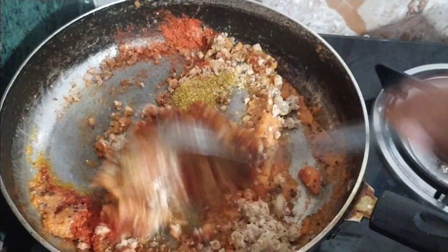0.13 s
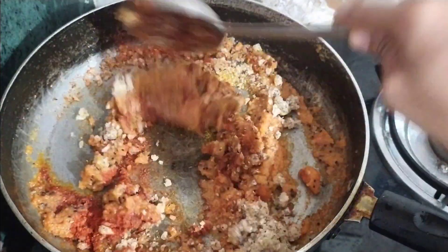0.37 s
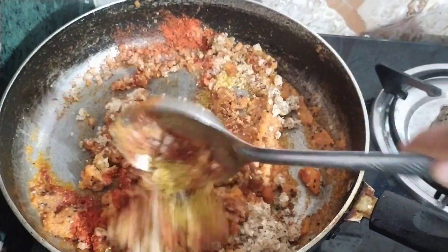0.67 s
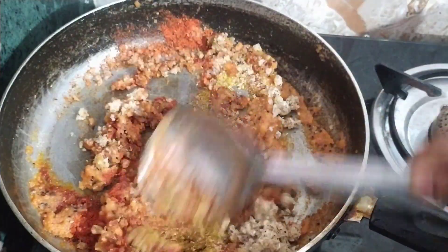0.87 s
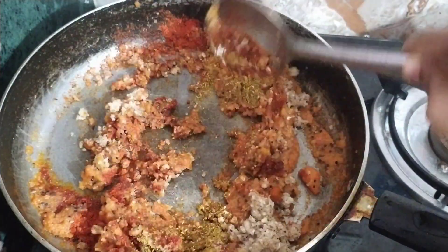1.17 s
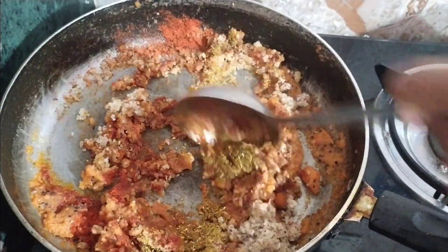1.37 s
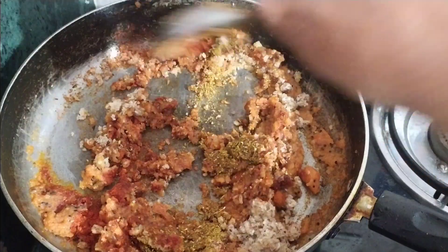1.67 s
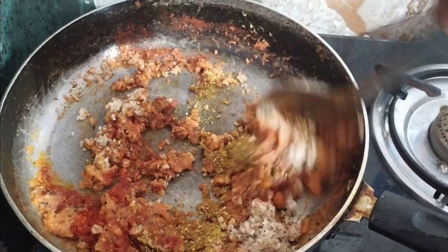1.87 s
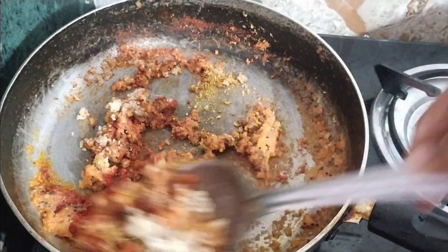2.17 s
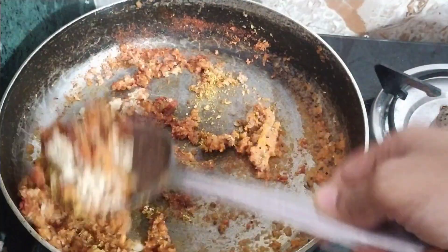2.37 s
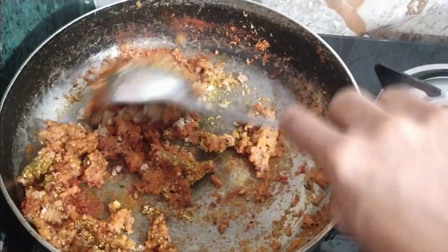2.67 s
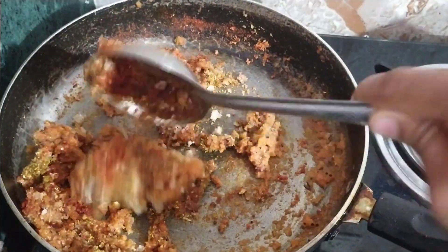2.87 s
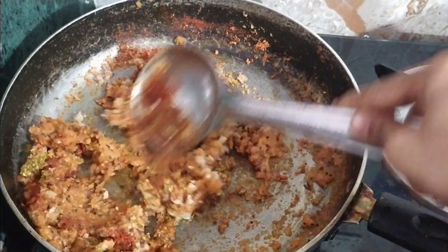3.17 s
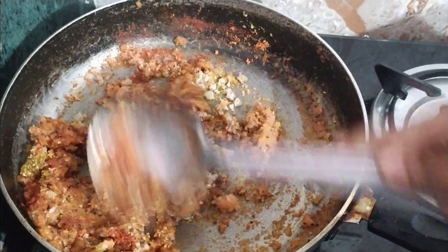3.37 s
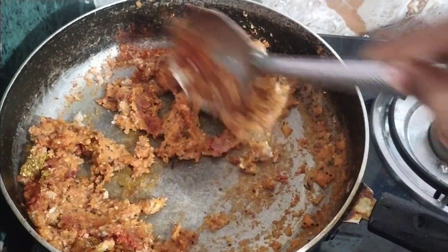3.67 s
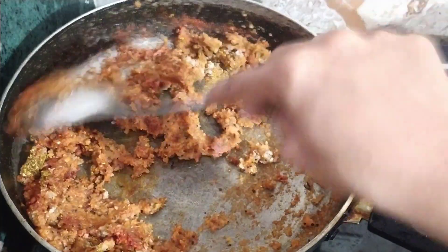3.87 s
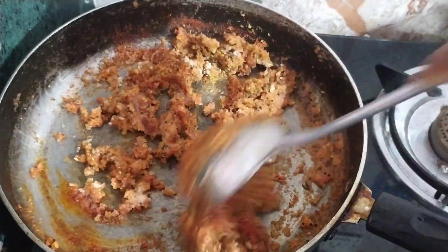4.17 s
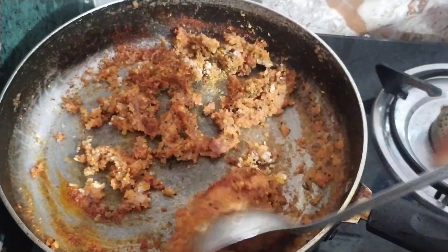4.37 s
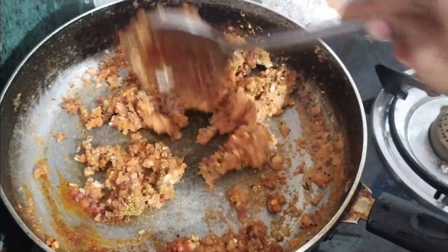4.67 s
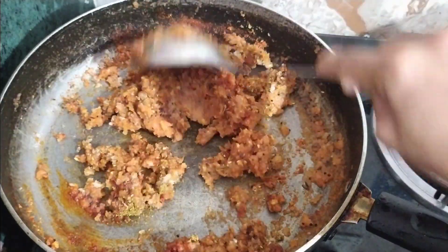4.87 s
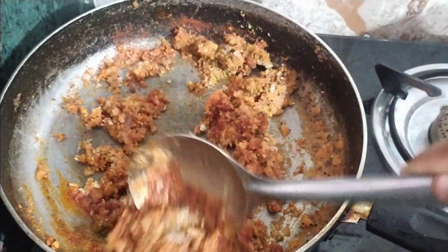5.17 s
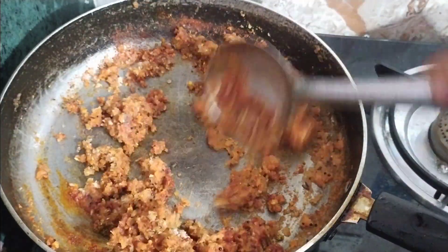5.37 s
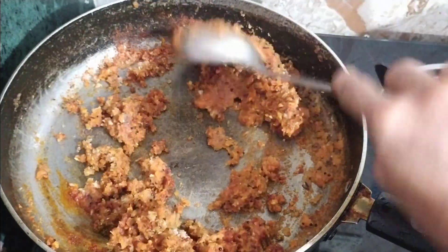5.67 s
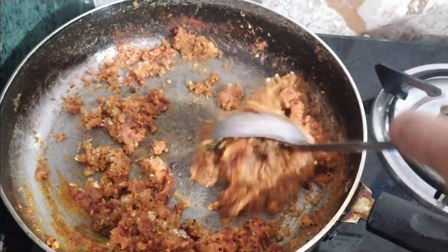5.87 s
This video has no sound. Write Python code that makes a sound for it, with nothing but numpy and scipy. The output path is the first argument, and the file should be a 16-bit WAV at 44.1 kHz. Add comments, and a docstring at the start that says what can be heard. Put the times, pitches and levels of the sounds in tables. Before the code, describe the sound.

A steel spoon stirs thick paste in a shallow metal pan. Bright oil sizzle runs throughout, crackling with tiny pops. Hard knocks come early, followed by uneven, short scrapes, soft paste thuds and wet hisses. Stirring continues in bursts until a rough squeak near the end. The microphone is close in a small echoing kitchen, with nearly all the sound on the left.

```python
"""Stirring spice paste in a frying pan

A steel spoon stirs thick paste: it knocks on the pan (impact, bending waves, modes of the metal), then drags
and chatters over it (friction, stick and slip), while lumps of paste thud. The paste sizzles in oil
throughout as steam bubbles burst, and it flares where it is turned; a gas flame rushes softly.
A small hard-walled kitchen adds diffuse echoes; the left microphone takes nearly all of the sound,
and a limiter catches the hardest knocks."""
import sys
import numpy as np
from scipy import signal
from scipy.fft import rfft, irfft, next_fast_len
from scipy.io import wavfile
from scipy.ndimage import uniform_filter1d, minimum_filter1d, map_coordinates

SR = 44100
rng = np.random.default_rng(int(sys.argv[2]) if len(sys.argv) > 2 else 0)


def wav_record(signal):
    """Record a signal, one row per channel, as 16-bit PCM in the file named by sys.argv[1]."""
    frames = np.transpose(np.atleast_2d(signal))
    bounded = np.clip(frames, -1, 1)
    # unit amplitude maps onto the largest positive 16-bit level
    quanta = np.round(bounded * 32767).astype(np.int16)
    wavfile.write(sys.argv[1], SR, quanta)


N = 265923  # samples in the scene

# Event levels are relative: the functions add an offset for each layer.
# Oil frying. Each row: time in seconds, level in dB.
FRYING = [(0.0, -30.5), (0.16, -33), (0.37, -30.5), (0.86, -31.5), (1.24, -30.5), (1.53, -32), (1.93, -33),
          (2.85, -31.5), (3.12, -31.5), (3.32, -33), (3.79, -33.5), (4.05, -32), (4.3, -33), (4.45, -30),
          (4.75, -32.5), (5.0, -30), (5.62, -33.5), (5.81, -31.5), (6.03, -31.5)]
# Turned paste settles on hot metal and the frying flares up. Each row: start in seconds, rise in dB.
FLARES = [(0.24, 2), (4.225, 3.5), (5.13, 4)]
# The spoon is pushed through the paste. Each row: start in seconds, length in seconds, metal scrape in dB,
# ring in dB, ring pitch in Hz, paste drag in dB, wet hiss in dB.
PUSHES = [(0.0, 0.046, -31, -60, 890, -50, -53), (0.178, 0.19, -31.5, -33, 987, -41, -53),
          (0.58, 0.06, -37, -47, 880, -54, -46), (0.625, 0.13, -22.5, -26, 884, -35.5, -33.5),
          (0.913, 0.14, -39.5, -49, 870, -48, -41), (0.993, 0.061, -29, -25.5, 1018, -46, -31.5),
          (1.063, 0.054, -29.5, -29, 890, -45, -35), (1.317, 0.1, -32.5, -47, 784, -47, -40),
          (1.37, 0.1, -30.5, -31.5, 832, -53, -30.5), (1.708, 0.14, -31, -34, 760, -35, -39),
          (1.81, 0.37, -31.5, -33, 751, -42.5, -33.5), (2.058, 0.081, -36.5, -30.5, 776, -57, -46),
          (2.137, 0.19, -38, -46, 774, -42.5, -38.5), (2.235, 0.32, -37, -43, 815, -52, -40),
          (2.74, 0.037, -32.5, -53, 880, -42, -38), (2.768, 0.11, -24, -31, 920, -34, -46),
          (3.223, 0.11, -27, -26, 1000, -44, -41), (3.252, 0.091, -31.5, -30, 930, -41, -51),
          (3.548, 0.08, -39, -40, 950, -34, -44), (3.607, 0.089, -23, -24.5, 1030, -41, -32),
          (3.656, 0.097, -31, -29, 974, -41, -36.5), (3.992, 0.13, -27.5, -24.5, 938, -27, -47),
          (4.165, 0.072, -32.5, -35, 900, -36.5, -39), (4.486, 0.08, -33, -47, 820, -37, -43),
          (4.565, 0.17, -32.5, -52, 945, -64, -32), (4.623, 0.14, -44, -32, 970, -55, -35),
          (4.943, 0.18, -28.5, -34, 885, -38, -46), (5.335, 0.11, -34.5, -46, 796, -63, -36),
          (5.409, 0.14, -28, -26.5, 903, -38, -34), (5.811, 0.14, -25.5, -29, 954, -42, -37),
          (5.872, 0.089, -27, -30, 910, -50, -32)]
# The spoon meets the pan. Each row: start in seconds, clack in dB, broad clank in dB against the clack,
# tick in dB against the clack, clack pitch in Hz, clack's time to peak in seconds,
# direct sound on the right in dB.
KNOCKS = [(0.182, 3, -12, -9, 1150, .0018, 5.5), (0.188, -7.5, -2.5, -14, 1120, 0.0023, 0),
          (0.555, 0.5, -7.5, -10.5, 1393, 0.0023, 9.5), (0.559, -8, -8, -12, 780, .0025, 6),
          (1.001, -19, -6, -9, 1160, 0.002, -4), (1.010, -19, -4.5, -6, 1230, 0.0018, -5),
          (1.069, -18, -5.5, -12, 780, 0.0037, -5), (1.094, -18, -10, -10, 1350, 0.0026, -5),
          (1.34, -25, 2.5, -11, 1280, .003, -5), (1.693, -21.5, -9, -22, 770, 0.0042, -5),
          (1.729, -19, 4.5, -9, 1220, 0.0039, 5), (2.024, -6, -12, -24, 1540, 0.0016, 16),
          (2.031, -18.5, -18, -27, 760, 0.0048, 2), (2.054, -19, 0, -16, 750, 0.0051, -5),
          (2.219, -25.5, -15, -16, 1330, 0.0029, -5), (2.263, -29, -3, -19, 814, 0.0038, -5),
          (2.306, -23, -24, -24, 970, 0.0028, -5), (2.333, -22, -16, -9, 810, 0.0036, -5),
          (2.467, -22, -14, -27, 767, 0.0033, -5), (2.762, -9, -1, -11.5, 1410, 0.0024, 9),
          (2.765, -7.5, -16, -26, 844, 0.0039, 3), (2.771, -16, -8, -31, 820, 0.002, -3),
          (3.550, -31.5, 1.5, -10, 1450, .0022, -5), (3.639, -19, -8.5, -25, 1290, 0.0034, -5),
          (3.662, -19.5, -2, -22, 1250, 0.0019, -5), (3.714, -17, -18, -22, 1380, 0.0024, -5),
          (3.957, -10.5, 1, -20, 936, 0.0022, 8), (4.004, -18.5, 2.5, 1, 845, 0.0027, 5),
          (4.014, -12.5, -11, -27, 764, 0.0044, -3), (4.495, -16.5, -4, -7, 2115, 0.003, 3),
          (4.499, -15.5, -9.5, -26, 838, 0.0042, -5), (4.92, -10.5, -1, -12, 1350, 0.0025, 12),
          (4.957, -13, 2, -6.5, 1840, 0.0027, 8), (4.989, -17, -5, -22, 1870, 0.002, -5),
          (5.087, -16, -4, -29, 1315, 0.0028, 5), (5.366, -27, -2, -14, 1220, .0022, -3),
          (5.841, -19, -14, -16, 1390, 0.00094, -3), (5.897, -13, -14, -22, 1870, 0.0022, -5),
          (5.899, -15, -8, -24, 837, 0.0032, -5)]
# Lumps of paste land and the pan rocks on the burner. Each row: start in seconds, thump in dB,
# thump pitch in Hz, splat in dB.
PLOPS = [(0.201, -28, 248, -26), (0.211, -21, 400, -26), (0.22, -23.5, 190, -19), (0.557, -22, 400, -22),
         (0.932, -34, 402, -28), (1.338, -23, 229, -27), (1.354, -37, 217, -24.5), (1.703, -29, 243, -27),
         (1.918, -25, 470, -29), (2.048, -30.5, 240, -30), (3.554, -32, 360, -24.5),
         (3.957, -30, 293, -22.5), (4.015, -19, 426, -19.5), (4.022, -37, 167, -31), (4.502, -26, 259, -27),
         (4.513, -24, 394, -31), (4.519, -27.5, 236, -41), (4.92, -23.5, 232, -19), (4.965, -30, 240, -37),
         (4.957, -22, 505, -19.5)]
# The bowl catches on the metal and sings above the scrape. Each row: start in seconds, length in seconds,
# level in dB, pitch in Hz.
SINGS = [(0.563, 0.1, -31, 2100), (0.63, 0.16, -27.5, 1820), (1.074, 0.051, -27, 1360),
         (1.334, 0.035, -28.5, 1304), (1.363, 0.07, -27, 1940), (1.724, 0.034, -28, 2530),
         (2.756, 0.097, -24, 2490), (2.77, 0.058, -26, 1290), (3.257, 0.07, -28.5, 1286),
         (3.627, 0.049, -22.5, 1400), (3.964, 0.034, -22, 1420), (4.957, 0.052, -25, 1910),
         (4.627, 0.069, -31, 2880), (4.614, 0.098, -33, 3640), (5.413, 0.067, -31, 2120),
         (5.885, 0.076, -27, 1320)]
# The spoon's edge sticks and slips. Each row: time in seconds, level in dB, mean slips per second.
CHATTER = [(5.804, -24, 1220), (5.811, -24.5, 1370), (5.832, -16, 1330), (5.865, -22.5, 1410),
           (5.899, -18.5, 1380), (5.931, -26, 1300), (5.945, -60, 2200)]
# Modes of the pan, damped by the paste. Each row: frequency in Hz, level in dB, 60 dB decay time in seconds.
PAN_MODES = [(748, -4.5, 0.018), (1016, -1.5, 0.038), (1319, -2, 0.043), (1525, 3.5, 0.0084),
             (1870, 3, 0.012), (2160, -1.5, 0.015), (2640, 5, 0.005), (3710, -5.5, 0.1), (749, -26.5, 0.16),
             (783, -22, 0.25), (1402, -7, 0.16), (1920, -24, 0.13)]
# Reverberation of the kitchen. Each row: frequency in Hz, 60 dB decay time in seconds.
KITCHEN_DECAY = [(150, 0.46), (400, 0.6), (1000, 0.4), (2800, 0.53), (7000, 0.37), (14000, 0.28)]

# Spectra. Each row: frequency in Hz, relative level in dB per Hz.
ROOM_TONE_SPECTRUM = [(20, 9.5), (45, -5), (100, -7.5), (200, -5), (500, -10.5), (1000, -15.5), (3000, -62),
                      (10000, -45)]  # rumble of the kitchen
FLAME_SPECTRUM = [(60, -38), (170, 13.5), (270, 1), (360, 11.5), (560, -23), (1000, -5), (3000, -6)]  # rush of the gas flame
SIZZLE_SPECTRUM = [(100, -17), (300, -11), (600, -15), (800, -10), (1300, -9.5), (3300, -11), (5200, -9),
                   (6500, -5), (8000, -1.5), (10500, 1), (11300, 7), (12600, -2.5), (14500, -10),
                   (15700, -14.5)]  # merged steam bubbles
POP_SPECTRUM = [(500, -3), (1500, -8), (3500, 2), (7000, -6), (11300, -25), (15000, -14)]  # single bubbles popping
GRIT_SPECTRUM = [(300, -29.5), (600, -10.5), (800, 8), (1100, -4), (2000, 0.5), (3000, -1), (6000, -27),
                 (12000, -2)]  # slips of the edge on the metal
CRUNCH_SPECTRUM = [(300, -26), (800, 0), (1500, -2.5), (2600, -6.5), (5000, -8), (12000, -21)]  # bits of spice cracking under the edge
PASTE_SPECTRUM = [(40, -32), (110, -13.5), (175, -12), (230, 5), (295, -3), (400, 5.5), (500, -2.5),
                  (650, 1), (1100, -59), (3000, -74)]  # soft paste, dragged or landing
STEAM_SPECTRUM = [(300, -22), (900, -6.5), (2500, 4.5), (3700, 1.5), (5500, 6), (8500, 6), (10400, 5),
                  (11300, 14.5), (12800, 1), (15500, -21)]  # steam from smeared paste
TICK_SPECTRUM = [(60, -83), (300, -53), (900, -14), (2500, 3), (3700, 7), (4700, 7), (5500, 8.5), (8500, 8),
                 (10400, 7.5), (11300, 13.5), (12800, 2), (15500, -23)]  # the tick of steel
CLANK_SPECTRUM = [(40, -42), (120, -13.5), (400, -8.5), (650, -0.5), (850, 3.5), (1400, 1.5), (2000, 0),
                  (2600, -3.5), (3100, -9), (6000, -13.5), (12000, -23)]  # the pan's broad answer to a blow
# Filter shapes. Each row: frequency in Hz, gain in dB.
SQUAWK_SHAPE = [(400, -30), (900, -1), (1400, 2), (1850, 21), (2300, -5), (3500, -13), (8000, -9)]  # colour of the slipping force
RIGHT_MICROPHONE = [(60, 1.5), (200, -30), (500, -44), (1200, -34.5), (2400, -31), (4400, -23), (6500, -18),
                    (8300, -11.5), (9800, -20), (11200, -28), (13000, -23.5), (15500, -6)]  # the right microphone against the left

FRY_DB = 6.5  # the sizzle over its level curve
FLARE_RISE_S = 0.028  # time to the top of a flare
PRESS_SHARE, HOLD_SHARE = 0.19, 0.067  # parts of a push in which the force builds and is held
RING_SPLIT, RING_T60_S = 0.011, 0.022  # close pair under the spoon: half spacing as a share, decay
SING_SPLIT, SING_T60_S = 0.025, 0.017  # the same for the bowl's singing mode
SAG_PER_S = 0.57  # exponential rate at which the rings sink as the spoon travels
CLACK_GLIDE, GLIDE_S = 1, 0.00075  # a clack starts this share above its pitch and sinks with this time constant
KNOCK_WET_DB, DRIER_PER_DB = -4, 0.2091  # echo gain of a 0 dB knock; dB more for each dB softer (paste muffles)
ROOM_DELAY_S, ROOM_BUILD_S = 0.004, 0.0024  # wait for the wall reflections, time they take to thicken
TOP_HZ = 15850  # upper band limit


def amp(db):
    """Level law: decibels to linear gain."""
    return 10 ** (np.asarray(db) / 20)


def unit(x):
    """Normalisation of power: x at rms 1."""
    return x / np.sqrt(np.mean(x ** 2) + 1e-20)


def peak(x):
    """Normalisation of amplitude: x at peak 1."""
    return x / np.abs(x).max()


def steadied(x, size):
    """Automatic gain: x held near rms 1 over stretches of size samples."""
    local_power = np.abs(uniform_filter1d(unit(x) ** 2, size=size))
    return x / np.sqrt(local_power + 1e-4) / np.std(x)


def along(points, hz):
    """Interpolation on a logarithmic frequency axis of (Hz, value) points."""
    f, v = np.transpose(points)
    return np.interp(np.log(hz + 1), np.log(f + 1), v)


def gains(rows):
    """Envelope: gain per sample for each column after the time, read as dB; silent outside the rows."""
    s, *columns = np.transpose(rows)
    now = np.arange(N) / SR
    inside = (now >= s[0]) & (now <= s[-1])
    gate = uniform_filter1d(1.0 * inside, size=400)
    return np.array([gate * amp(np.interp(now, s, column)) for column in columns])


def wobble(rate):
    """Slow random modulation: a smooth curve through rate random knots a second."""
    knots = rng.standard_normal(int(N * rate / SR) + 4)
    return map_coordinates(knots, [np.arange(N) * rate / SR])


def swell(t, rise):
    """Critically damped pulse: a smooth bump that peaks at 1 at time rise and then dies away."""
    return t / rise * np.exp(1 - t / rise)


def coloured(x, spectrum):
    """Minimum-phase filtering: the cepstrum is folded so that the given (Hz, dB) shape is causal."""
    m = 2 * next_fast_len(x.shape[-1] // 2 + 4096)
    cepstrum = irfft(np.log(amp(along(spectrum, np.fft.rfftfreq(m, 1 / SR)))))
    cepstrum[1:m // 2] *= 2
    cepstrum[m // 2 + 1:] = 0
    return irfft(rfft(x, m) * np.exp(rfft(cepstrum)), m)[..., :x.shape[-1]]


def grains(rate, spread_db):
    """Random arrivals: tiny clicks, rate a second on average, of random sign and uneven size; rms 1."""
    size = amp(spread_db * np.minimum(rng.exponential(size=N), 3.5))
    arrivals = rng.random(N) < rate / SR
    return unit(arrivals * size * rng.choice([-1, 1], N))


def add(track, s, sound):
    """Superposition: mix a sound into the track at time s."""
    part = track[..., round(s * SR):][..., :sound.shape[-1]]
    part += sound[..., :part.shape[-1]]


def in_kitchen(x, wet_db, right_db=2.5):
    """Diffuse reverberation: direct sound on two channels plus a decaying noise tail for each microphone."""
    hz, t, z = signal.stft(rng.standard_normal((2, SR * 2 // 3)), SR, nperseg=256)
    decay = amp(-60 * t / along(KITCHEN_DECAY, hz)[:, None])
    tail = signal.istft(z * decay, SR, nperseg=256)[1]
    tail = tail * (1 - np.exp(-np.arange(tail.shape[1]) / SR / ROOM_BUILD_S))
    tail = np.pad(tail / np.linalg.norm(tail[0]), ((0, 0), (round(ROOM_DELAY_S * SR), 0)))
    echo = signal.oaconvolve(x[None], tail, axes=1)[:, :len(x)]
    # the shielded right microphone hears more of the walls than of the pan
    return x * amp([[0], [right_db]]) + amp(wet_db) * echo * amp([[0], [5]])


def pan_ring(modes):
    """Modal superposition: the given pan modes, each decaying exponentially, answer one tap."""
    t = np.arange(SR // 3) / SR
    ring = np.zeros(len(t))
    for k, (hz, db, t60) in enumerate(modes):
        ring += (-1) ** k * amp(db - 60 * t / t60) * np.cos(2 * np.pi * hz * t)
    return ring


def bending_wave(spread):
    """Dispersion in sheet metal: of a tap the treble arrives first, 1 kHz about spread seconds later."""
    hz = np.fft.rfftfreq(SR, 1 / SR)
    return irfft(np.exp(-4j * np.pi * spread * np.sqrt(1000 * hz)), SR)[:SR * 2 // 3]


def push(s, length):
    """Contact force of one push: the hand presses, holds and lets go."""
    corners = [0, PRESS_SHARE, PRESS_SHARE + HOLD_SHARE, 1]
    return np.interp((np.arange(N) / SR - s) / length, corners, [0, 1, 1, 0])


def ringing(slips, hz, t60, split):
    """Driven resonance: slips excite a close pair of modes that sink through hz halfway; rms about 1."""
    t = (np.arange(len(slips)) - len(slips) / 2) / SR
    phase = 2 * np.pi * np.cumsum(hz * np.exp(-SAG_PER_S * t)) / SR
    keep = amp(-60 / (t60 * SR))  # amplitude kept from one sample to the next

    def mode(side):
        turn = np.exp(1j * phase * (1 + side * split))
        return np.real(turn * signal.lfilter([1], [1, -keep], slips / turn))

    return steadied(mode(-1) - mode(1), size=1000)


def room_tone():
    """Stationary noise: a faint rumble in the kitchen and the turbulent soft rush of the gas flame."""
    rumble = unit(coloured(rng.standard_normal((2, N)), ROOM_TONE_SPECTRUM))
    flame = unit(coloured(rng.standard_normal((2, N)), FLAME_SPECTRUM))
    return amp(-49.0) * rumble + amp(-52.5) * flame


def sizzle():
    """Random superposition: bursting steam bubbles merge into a fizz with single pops; turned paste flares."""
    def patch():
        bubbles = coloured(grains(rate=12000, spread_db=-1.0), SIZZLE_SPECTRUM)
        return in_kitchen(bubbles, wet_db=1.0, right_db=-26)

    fizz = unit(patch() + patch()) * amp(1.3 * wobble(14))
    pops = coloured(grains(rate=690, spread_db=6.0) * amp(2.9 * wobble(25)), POP_SPECTRUM)
    sound = fizz + amp(-25.5) * unit(in_kitchen(pops, wet_db=4))
    now = np.arange(N) / SR
    flare_db = sum(db * swell(np.maximum(now - s, 0), FLARE_RISE_S) ** 2 for s, db in FLARES)
    return amp(FRY_DB + flare_db) * gains(FRYING)[0] * unit(sound)


def stirring():
    """Friction: the edge grates on the pan, cracks spice, drags paste and smears it into steam on hot metal.
    Where it presses decides the pitch of the pan's lowest ring."""
    catching = amp(1.6 * wobble(80))  # the edge grips unevenly on the grit
    slips = steadied(grains(rate=480, spread_db=2.5) * catching, size=1800)
    crunch = steadied(coloured(grains(rate=110, spread_db=2.0), CRUNCH_SPECTRUM), size=4000)
    scrape = signal.oaconvolve(coloured(slips, GRIT_SPECTRUM), pan_ring(PAN_MODES))[:N]
    grating = steadied(scrape, size=2000) + amp(-7) * crunch
    paste = steadied(coloured(grains(rate=630, spread_db=2.0), PASTE_SPECTRUM), size=2000)
    puffs = grains(rate=4300, spread_db=0.0) * catching ** 1.6
    steam = steadied(coloured(puffs, STEAM_SPECTRUM), size=1500)
    track = np.zeros(N)
    for s, length, scrape_db, ring_db, hz, drag_db, wet_db in PUSHES:
        force = push(s, length)
        on = np.flatnonzero(force)
        ring = ringing(slips[on], hz, RING_T60_S, RING_SPLIT)
        metal = amp(scrape_db) * grating[on] + amp(ring_db - 2.5) * ring
        wet = amp(drag_db - 1.5) * paste[on] + amp(wet_db + 9.0) * steam[on]
        track[on] += force[on] * (metal + wet)
    return in_kitchen(track, wet_db=-5.0)


def knocks():
    """Impact: each blow gives a steel tick, the sinking clack of the spoon's bowl and the pan's broad clank."""
    track = np.zeros((2, N))
    t = np.arange(SR * 2 // 3) / SR

    def burst(rise):
        return rng.standard_normal(len(t)) * swell(t, rise)

    wave, modes = bending_wave(spread=0.0025), pan_ring(PAN_MODES)
    sinking = t + CLACK_GLIDE * GLIDE_S * (1 - np.exp(-t / GLIDE_S))  # the integral of the falling pitch
    for s, db, clank_db, tick_db, hz, clack_s, right_db in KNOCKS:
        tick = peak(coloured(burst(rise=0.0012), TICK_SPECTRUM))
        # the loaded bowl is dead after a few cycles
        clack = swell(t, clack_s) ** 2 * np.sin(2 * np.pi * hz * sinking)
        clank = peak(coloured(wave + 0.12 * burst(rise=0.0025), CLANK_SPECTRUM))
        ring = peak(signal.fftconvolve(clank, modes)[:len(t)])
        strike = amp(clank_db + 6.5) * (clank + amp(-19.0) * ring) + amp(tick_db + 11) * tick
        wet_db = KNOCK_WET_DB - DRIER_PER_DB * db
        roomy = in_kitchen(strike + amp(-9.0) * clack, wet_db=wet_db, right_db=right_db)
        # part of the clack goes straight to the microphones
        beamed = amp(-4.0) * clack * amp([[0], [right_db]])
        add(track, s, amp(db) * (roomy + beamed))
    return track


def plops():
    """Soft impact: a falling lump gives a noisy thud and a few low cycles of the pan's body."""
    track = np.zeros(N)
    t = np.arange(SR // 4) / SR
    for s, thump_db, hz, splat_db in PLOPS:
        thump = swell(t, rise=0.0051) * np.sin(2 * np.pi * hz * t)
        noise = rng.standard_normal(len(t)) * swell(t, rise=0.0058)
        splat = peak(coloured(noise, PASTE_SPECTRUM))
        add(track, s, amp(thump_db) * thump + amp(splat_db) * splat)
    return in_kitchen(track, wet_db=-8.0)


def singing():
    """Friction-driven resonance: where the bowl's rim bites, dense slips ring one of its upper modes."""
    slips = grains(rate=1500, spread_db=1.5)
    track = np.zeros(N)
    for s, length, db, hz in SINGS:
        force = push(s, length)
        on = np.flatnonzero(force)
        track[on] += amp(db) * force[on] * ringing(slips[on], hz, SING_T60_S, SING_SPLIT)
    return in_kitchen(track, wet_db=-10.5)


def chatter():
    """Stick-slip oscillation: on a patch of bare metal the slips turn nearly regular and the pan squawks."""
    s, _, slips = np.transpose(CHATTER)
    rate = np.interp(np.arange(N) / SR, s, slips) * np.exp(0.11 * wobble(600))
    force = np.cumsum(rate / SR) % 1 - .5  # builds while stuck, drops at each slip
    squawk = signal.fftconvolve(coloured(force, SQUAWK_SHAPE), pan_ring(PAN_MODES))[:N]
    level = amp(1.0) * gains(CHATTER)[0]
    return in_kitchen(level * steadied(squawk, size=500), wet_db=-21)


def scene():
    """Superposition of all sources: everything from the stove but the flame is much weaker on the right."""
    left, right = sizzle() + stirring() + singing() + chatter() + knocks() + plops()
    return np.array([left, coloured(right, RIGHT_MICROPHONE)]) + room_tone() * amp([[0], [-7]])


def record(dry):
    """Peak limiting: each channel ducks around the hardest knocks, whose tips still clip; then a band limit."""
    needed = np.minimum(1, 1.38 / (np.abs(dry) + 1e-9))
    # the lowest gain needed nearby, ahead and behind, then smoothed
    gain = uniform_filter1d(minimum_filter1d(needed, size=800, origin=-20), size=160)
    held = np.clip(dry * gain, -1, 1)
    m = next_fast_len(N + 4096)
    passed = np.fft.rfftfreq(m, 1 / SR) < TOP_HZ
    return irfft(rfft(held, m) * passed, m)[:, :N]


dry = scene()
out = record(dry)
wav_record(out)
```